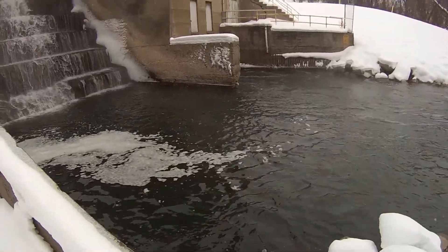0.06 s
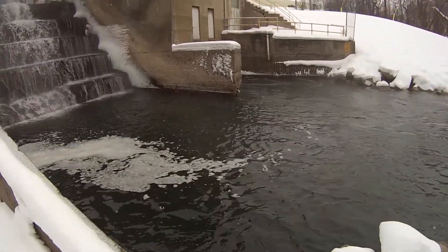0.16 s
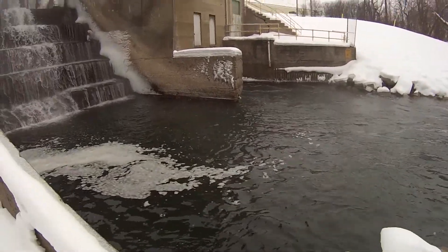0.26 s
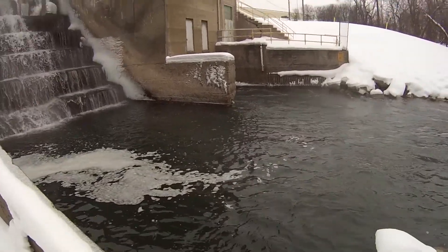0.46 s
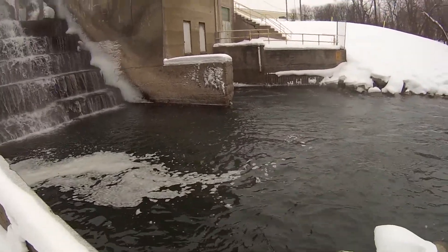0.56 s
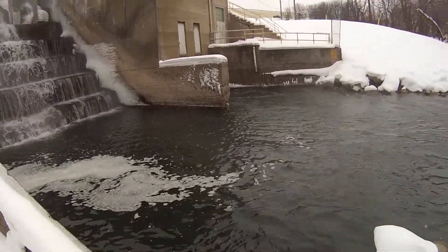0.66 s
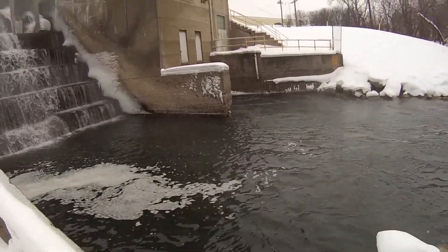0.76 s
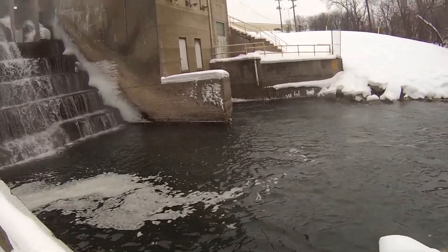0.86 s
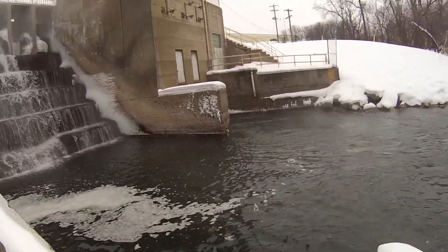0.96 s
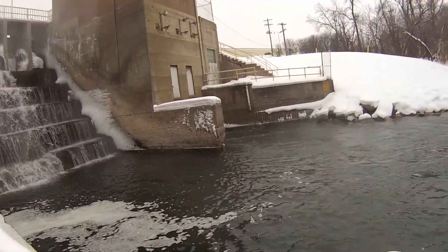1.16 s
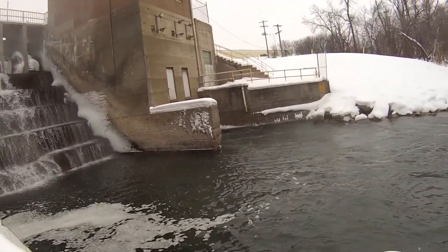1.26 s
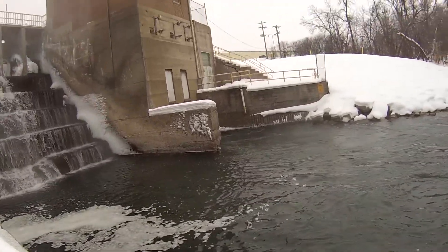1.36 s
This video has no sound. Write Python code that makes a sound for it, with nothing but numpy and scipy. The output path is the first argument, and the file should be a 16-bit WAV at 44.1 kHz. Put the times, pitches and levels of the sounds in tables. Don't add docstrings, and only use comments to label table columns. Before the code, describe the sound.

Water rushes steadily down a stepped concrete spillway, with soft low handling bumps early on

```python
import sys
import numpy as np
from scipy import signal
from scipy.fft import rfft, irfft, next_fast_len
from scipy.io import wavfile
from scipy.ndimage import uniform_filter1d, map_coordinates

SR = 44100
rng = np.random.default_rng(int(sys.argv[2]) if len(sys.argv) > 2 else 0)


def wav_record(signal):
    frames = np.transpose(np.atleast_2d(signal))
    bounded = np.clip(frames, -1, 1)
    quanta = np.round(bounded * 32767).astype(np.int16)
    wavfile.write(sys.argv[1], SR, quanta)


def ratio(d):
    e = np.asarray(d, float) / 20
    return 10 ** e


N = 61740


def unit(x):
    return x / np.sqrt(np.mean(x ** 2) + 1e-20)


def along(points, hz):
    f, level = np.transpose(points)
    return np.interp(np.log(hz + 1), np.log(f + 1), level)


def wobble(rate):
    return map_coordinates(rng.standard_normal(200), [np.arange(N) * rate / SR])


def filtered(x, response):
    m = next_fast_len(N + SR // 2)
    spectrum = rfft(x, m) * response(np.fft.rfftfreq(m, 1 / SR))
    return irfft(spectrum, m)[..., :N]


# f/Hz, level/dB per Hz
TREMOR = [(12, -2), (22, -4), (50, 4), (66, -8.5), (90, -29.5), (140, -23.5), (220, -67), (400, -120)]
# t/s, level/dB over the resting tremor
GRIP = [(0, -5), (.13, 8), (.19, 3), (.33, 7.5), (.4, 1.5), (.44, 3), (.57, 7.5), (.62, 0), (.68, 5),
        (.8, -0.5), (.87, -1.5), (.99, 4.5), (1.06, 3.5), (1.18, -4.5), (1.3, -0.5), (1.4, -5)]


def tremor():
    t = np.arange(N) / SR
    shake = unit(filtered(rng.standard_normal(N), lambda hz: ratio(along(TREMOR, hz))))
    power = np.abs(uniform_filter1d(shake ** 2, size=2000))
    steady = unit(shake / np.sqrt(.1 + power))
    tremor_db, sway_db = -47, 1
    grip_db = np.interp(t, *np.transpose(GRIP))
    return steady * ratio(tremor_db + grip_db + sway_db * wobble(4.6))


# centre t/s, f/Hz, level/dB, half length/s
BUMPS = [(.2125, 54, -29, .008), (.2295, 58, -28, .009), (.2455, 66, -29, .006), (.2525, 115, -36, .0035),
         (.269, 52, -20, .011), (.398, 30, -30, .010), (.4285, 46, -12, .0085), (.4635, 38, -24, .011),
         (.5025, 52, -18, .009), (.5205, 54, -24, .007), (.5395, 42, -22, .011)]
PUSH = [1, 1, 1, -1, -1, 1, 1, 1, 1, 1, 1]


def bumps():
    t = np.arange(N) / SR
    out = np.zeros(N)
    for (centre, hz, db, half), sign in zip(BUMPS, PUSH):
        since = t - centre
        envelope = np.exp(-.5 * (since / half) ** 2)
        out += sign * ratio(db) * envelope * np.sin(2 * np.pi * hz * since)
    return out


def fizz(count):
    middle_hz, spread, cycles, size_db = 2518, 0.59, 4.7, 2.5
    when, size = rng.random((count, 2)).T
    hz = middle_hz * np.exp(spread * rng.standard_normal(count))
    n = np.arange(300)
    turns = np.clip(hz, 500, 12000)[:, None] * n / SR
    level = ratio(-size_db * np.log(1 - size))[:, None]
    grains = level * np.sin(2 * np.pi * turns) * np.exp(-turns / cycles * 2)
    places = (when * N).astype(int)[:, None] + n
    return unit(np.bincount(places.ravel(), grains.ravel())[:N])


def rush(depth_db):
    z = signal.stft(rng.standard_normal(N), nperseg=512)[2]
    field = uniform_filter1d(rng.standard_normal(z.shape), size=8, axis=0)
    field = uniform_filter1d(field, size=10, axis=1)
    return signal.istft(z * ratio(depth_db * unit(field)), nperseg=512)[1][:N]


# f/Hz, width/Hz, level/dB
SHELL = [(1554, 191, 12.5), (1866, 390, -5.5), (2400, 640, 6), (2740, 166, -9), (3063, 520, -13),
         (3350, 290, 7.5), (4200, 640, -3.5), (4740, 330, 5), (4997, 235, 8.5), (6220, 730, -7.5),
         (6540, 200, 7), (7540, 800, 7.5), (8600, 2050, -6.5), (11370, 620, 3)]


def shell(hz):
    centre, width, db = np.transpose(SHELL)[:, :, None]
    stiffness = centre * centre - hz * hz
    damping = 1j * hz * width
    return np.prod((stiffness + damping * ratio(db)) / (stiffness + damping), axis=0)


# f/Hz, level/dB per Hz
FALL = [(60, 5), (300, -0.5), (600, -3), (1200, 1.5), (3000, -1), (7000, -12.5), (10000, -17),
        (15000, -35.5)]


def spillway():
    rush_db, fizz_db = -46, -61
    surge = ratio(.15 * wobble(3) + .35 * wobble(18))
    water = rush(depth_db=0.44) + ratio(fizz_db - rush_db) * fizz(count=5000)
    inside = filtered(water, lambda hz: ratio(along(FALL, hz)) * shell(hz))
    return ratio(rush_db) * surge * unit(inside)


def scene():
    return (tremor() + bumps() + spillway())[None]


def band_limit(x):
    return signal.sosfilt(signal.butter(12, 15290, fs=SR, output="sos"), x)


def record(dry):
    def port(hz):
        dip_db = -5 * np.exp(-((hz - 13400) / 250) ** 2)
        return ratio(dip_db) * (hz < 15290)

    return band_limit(filtered(dry, port))


dry = scene()
out = record(dry)
wav_record(out)
```